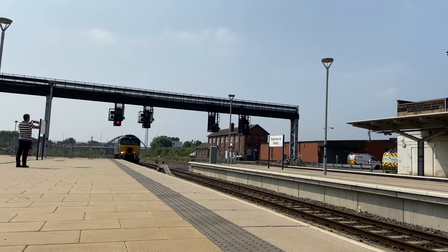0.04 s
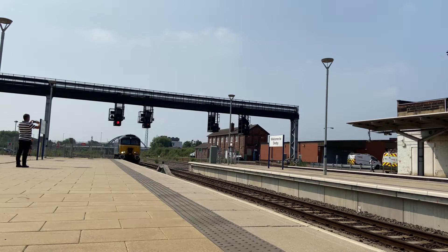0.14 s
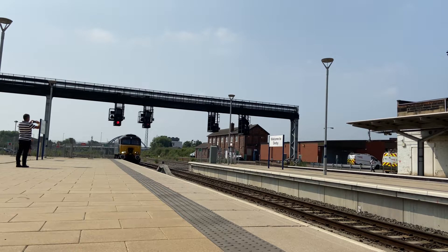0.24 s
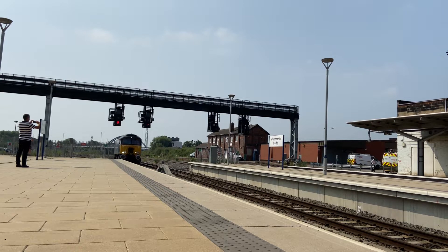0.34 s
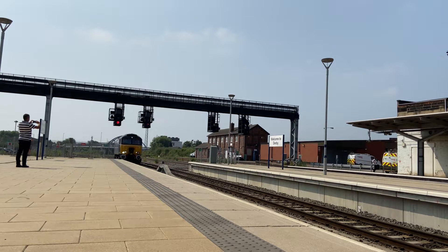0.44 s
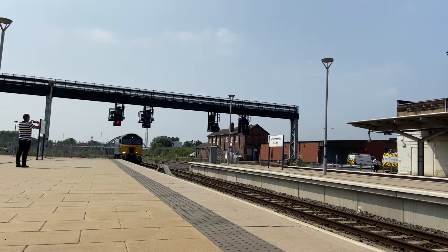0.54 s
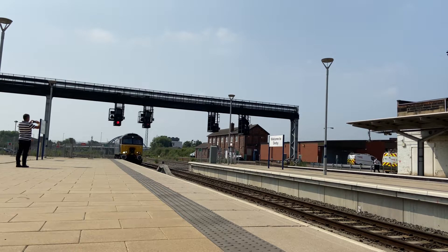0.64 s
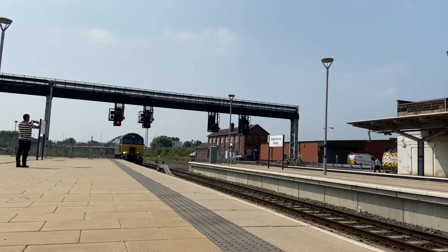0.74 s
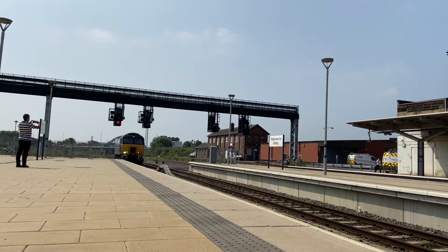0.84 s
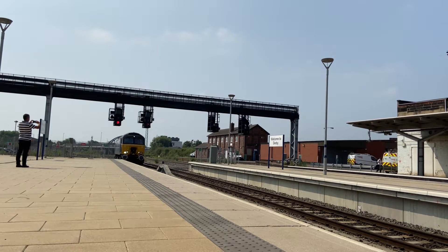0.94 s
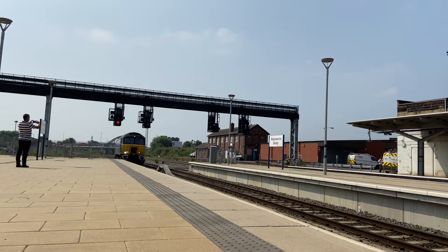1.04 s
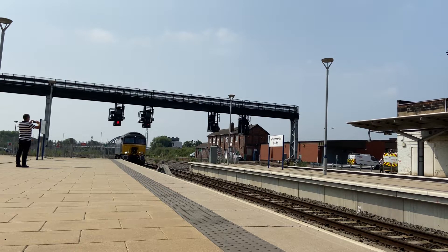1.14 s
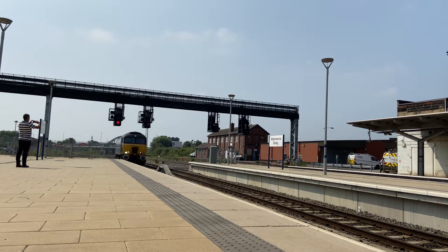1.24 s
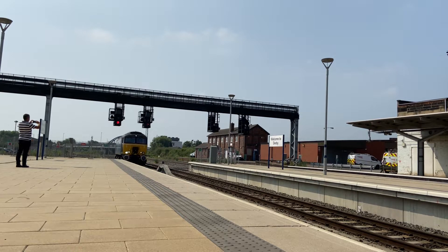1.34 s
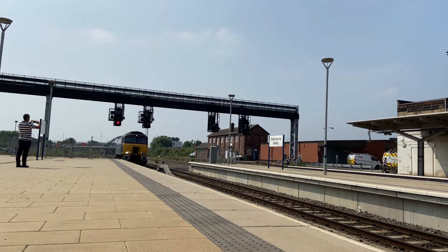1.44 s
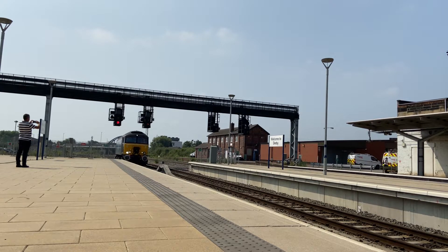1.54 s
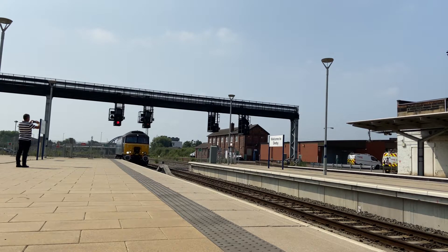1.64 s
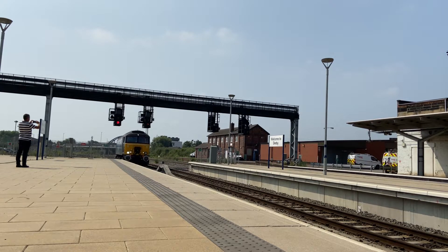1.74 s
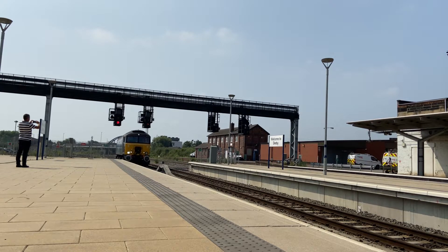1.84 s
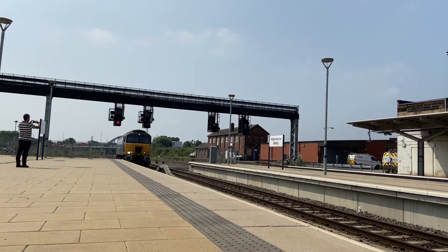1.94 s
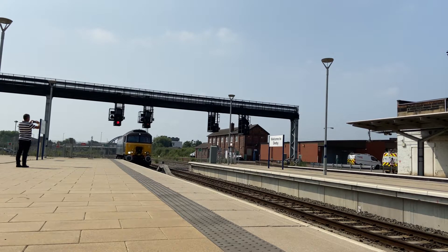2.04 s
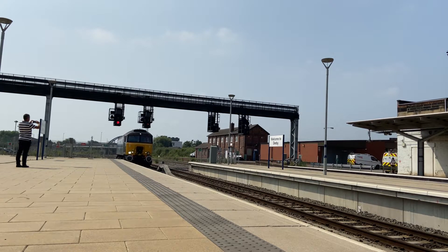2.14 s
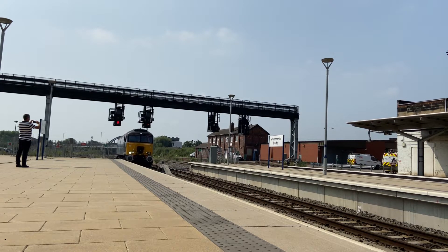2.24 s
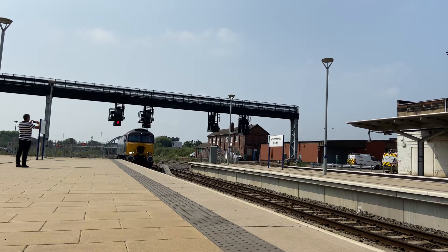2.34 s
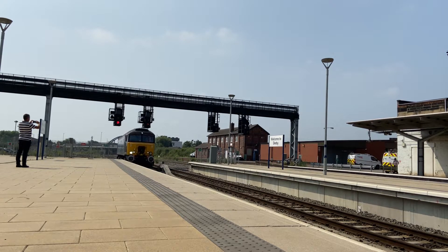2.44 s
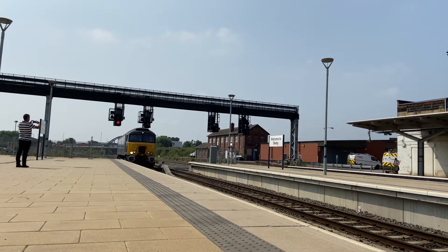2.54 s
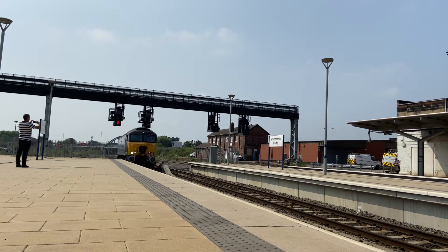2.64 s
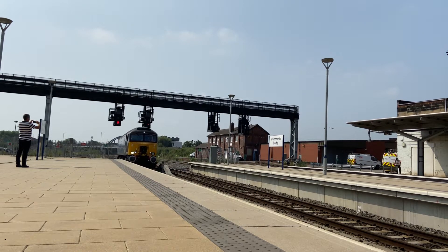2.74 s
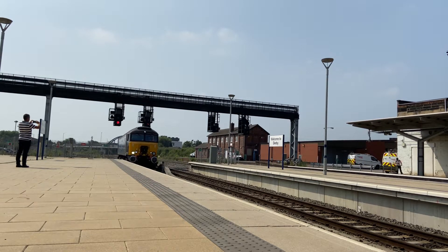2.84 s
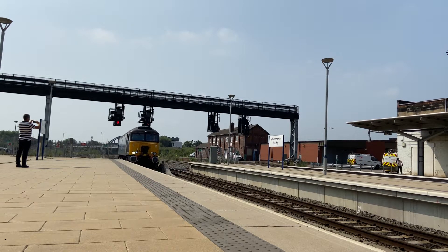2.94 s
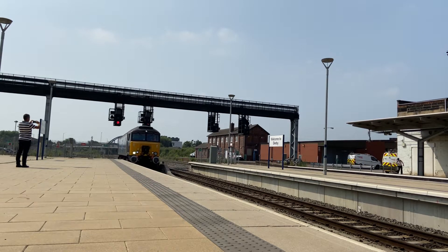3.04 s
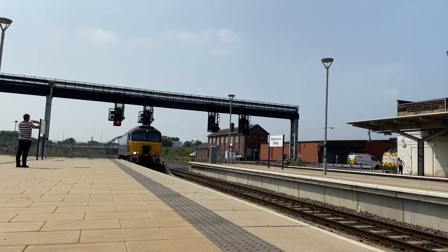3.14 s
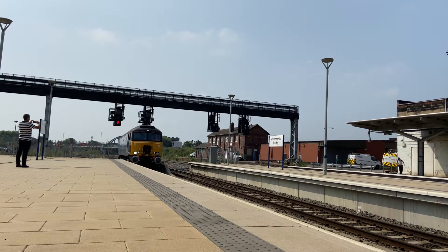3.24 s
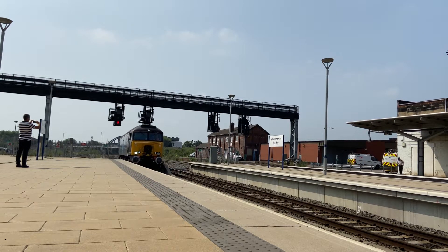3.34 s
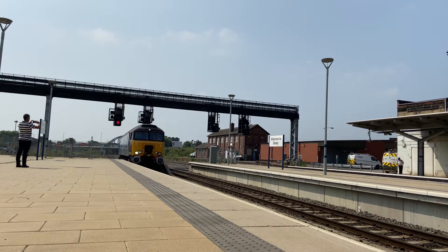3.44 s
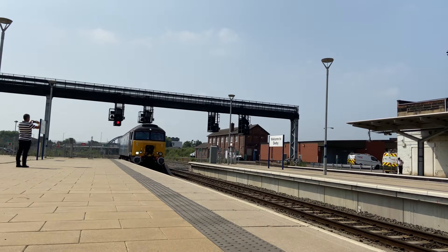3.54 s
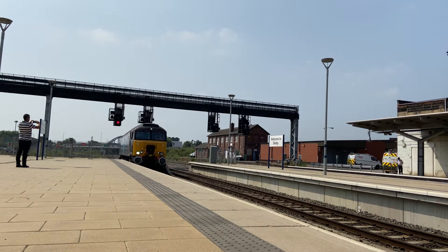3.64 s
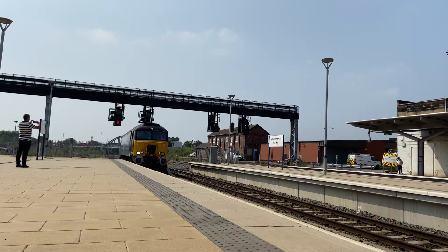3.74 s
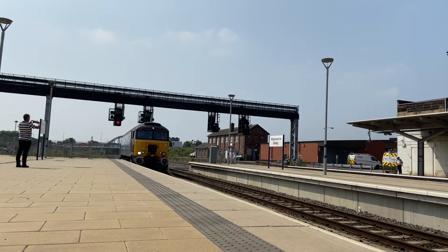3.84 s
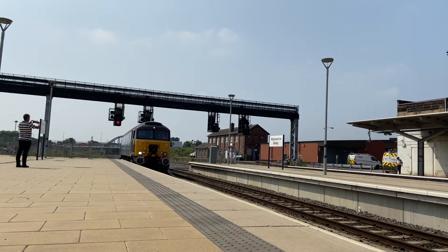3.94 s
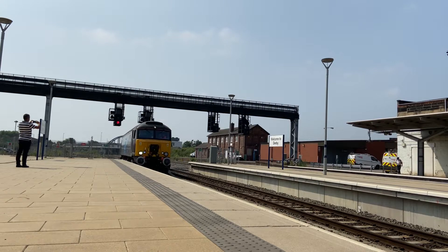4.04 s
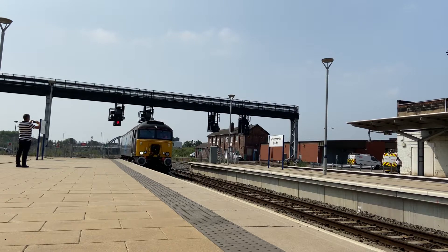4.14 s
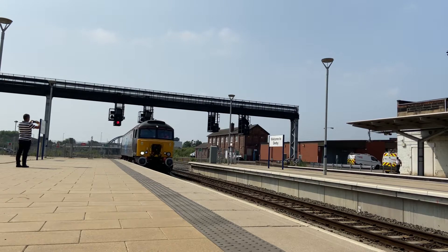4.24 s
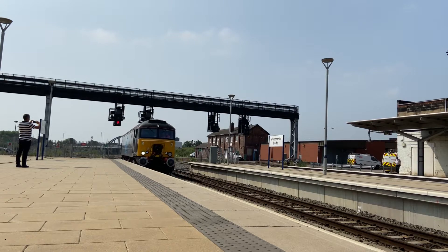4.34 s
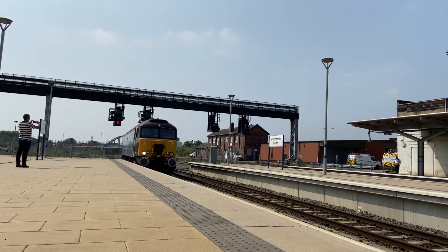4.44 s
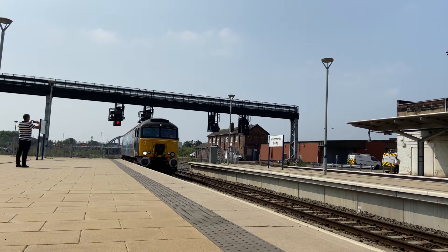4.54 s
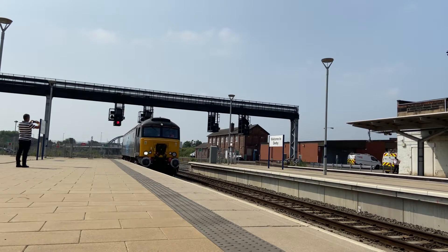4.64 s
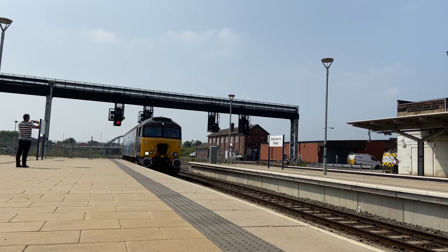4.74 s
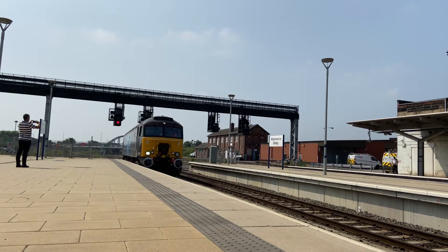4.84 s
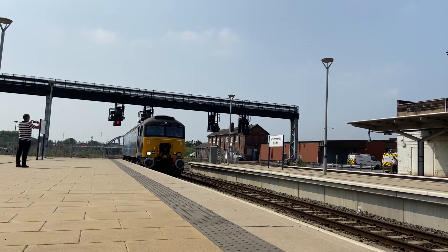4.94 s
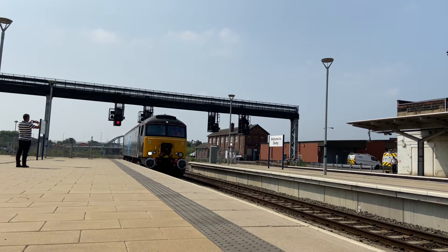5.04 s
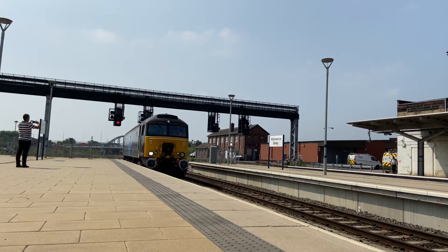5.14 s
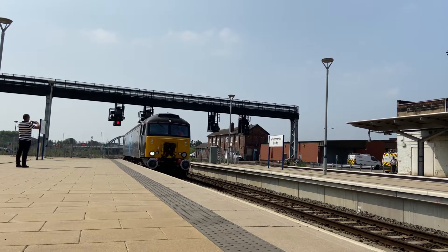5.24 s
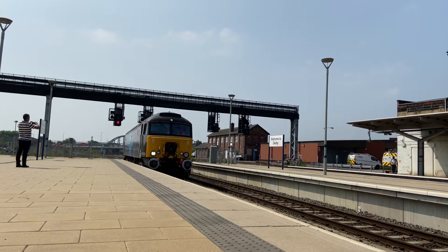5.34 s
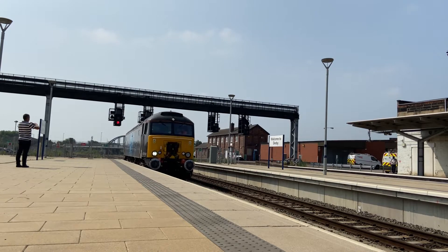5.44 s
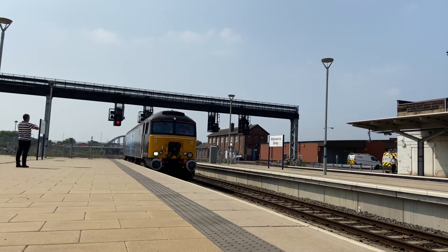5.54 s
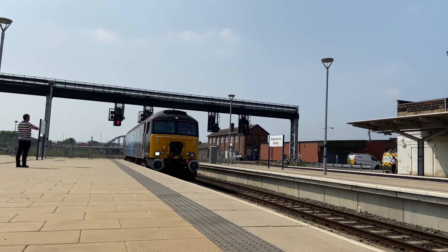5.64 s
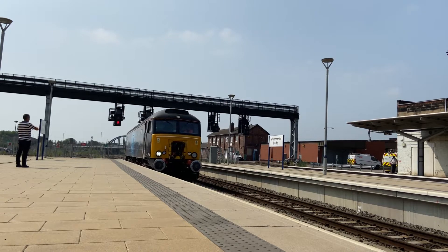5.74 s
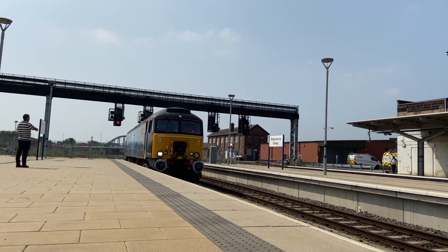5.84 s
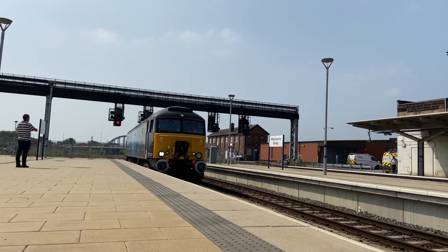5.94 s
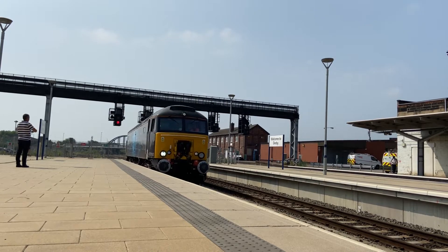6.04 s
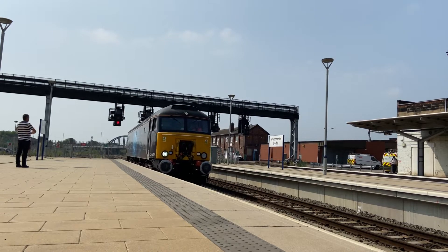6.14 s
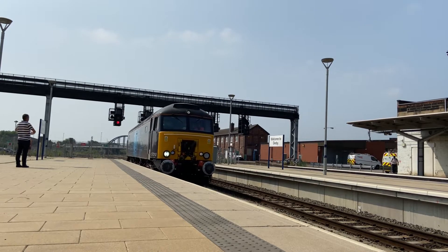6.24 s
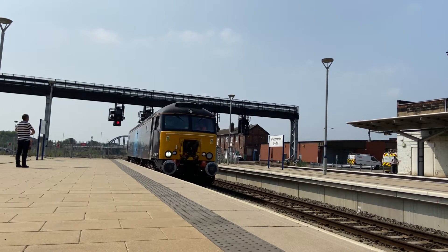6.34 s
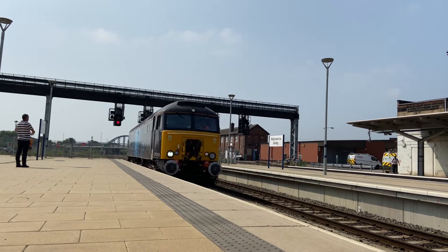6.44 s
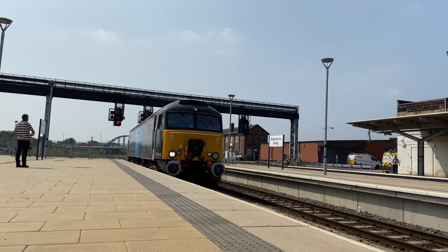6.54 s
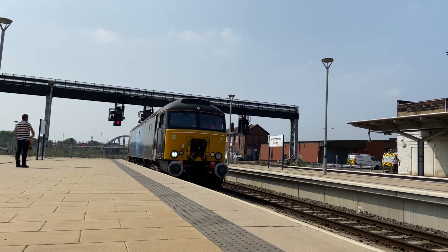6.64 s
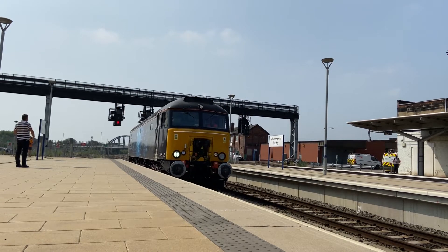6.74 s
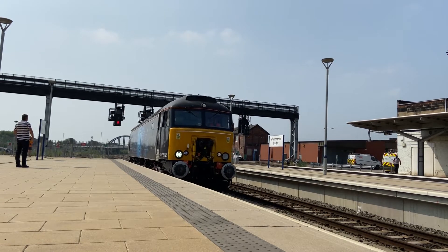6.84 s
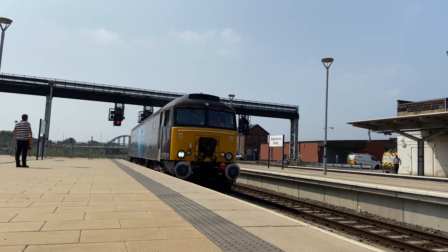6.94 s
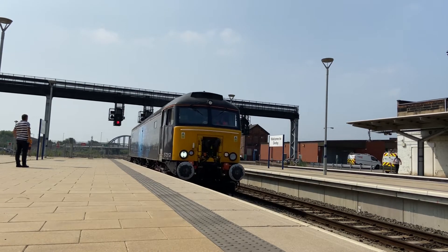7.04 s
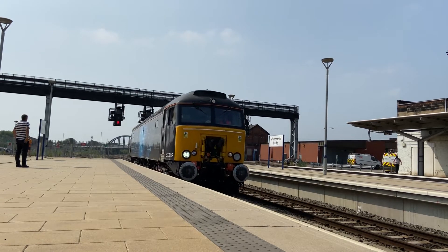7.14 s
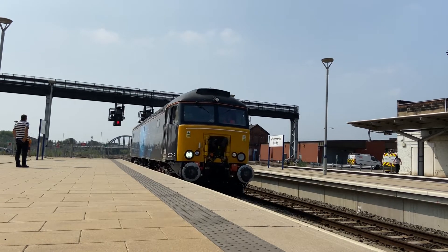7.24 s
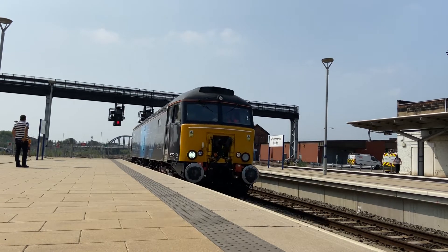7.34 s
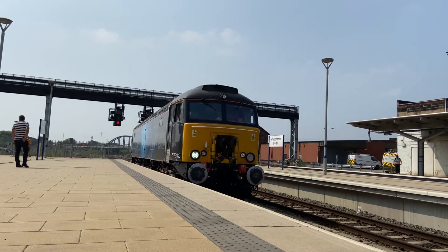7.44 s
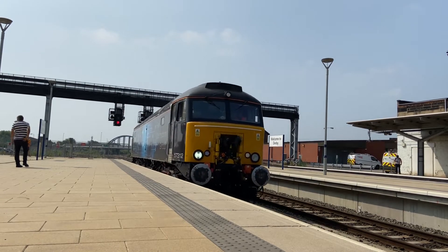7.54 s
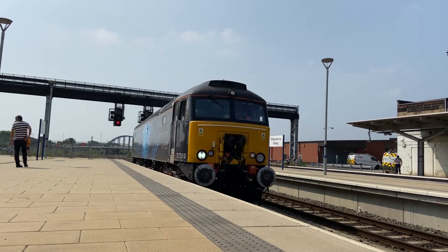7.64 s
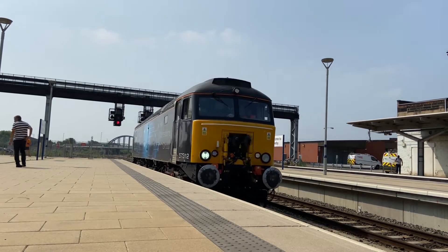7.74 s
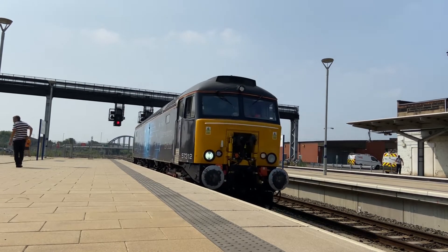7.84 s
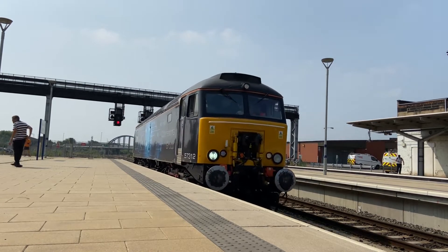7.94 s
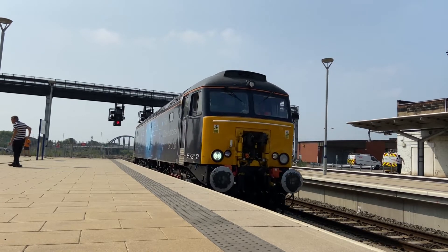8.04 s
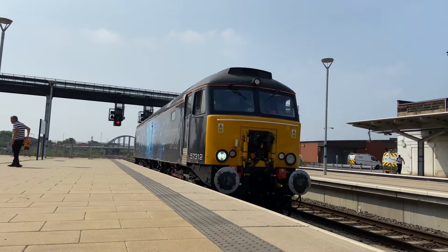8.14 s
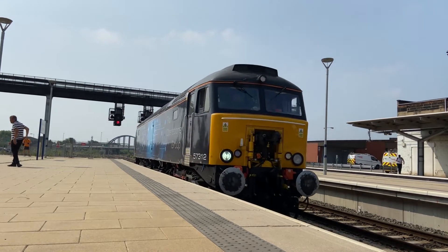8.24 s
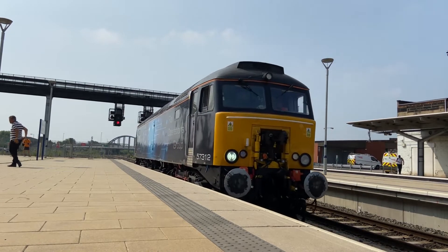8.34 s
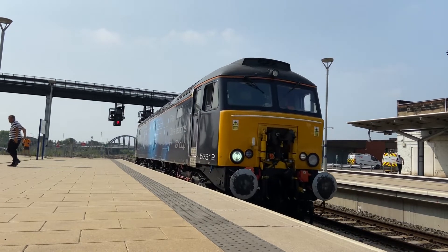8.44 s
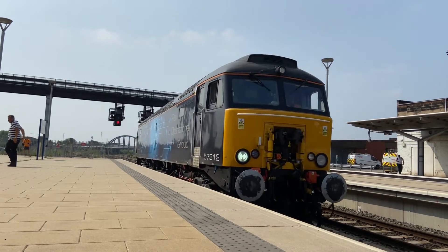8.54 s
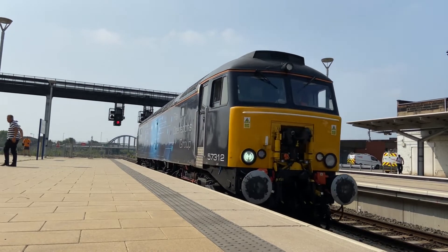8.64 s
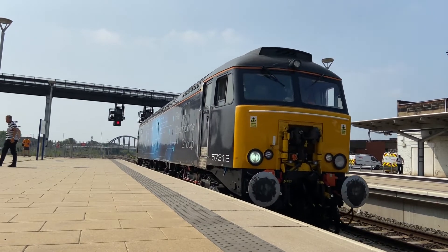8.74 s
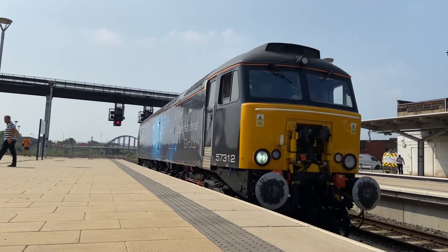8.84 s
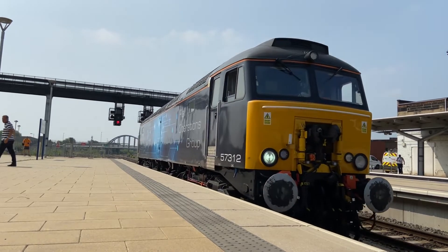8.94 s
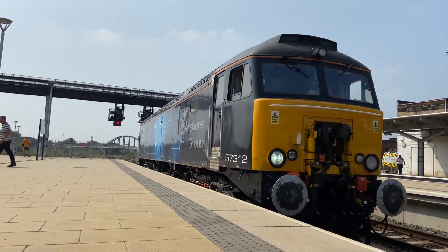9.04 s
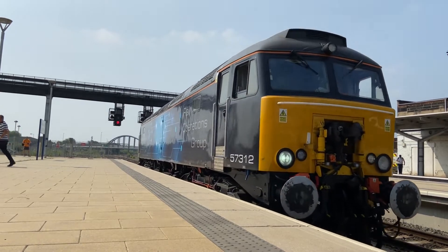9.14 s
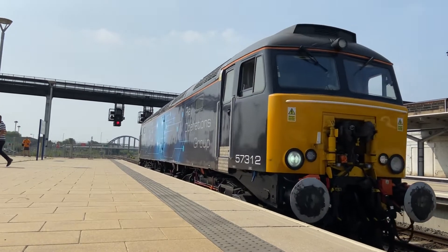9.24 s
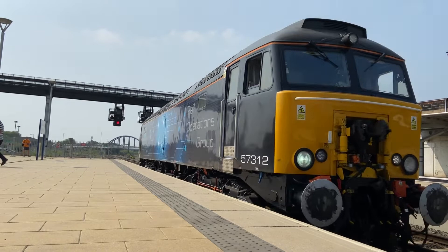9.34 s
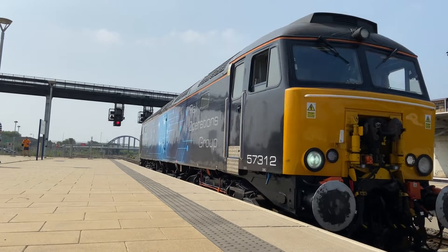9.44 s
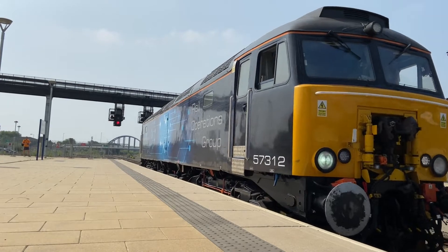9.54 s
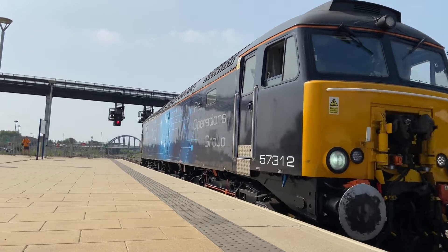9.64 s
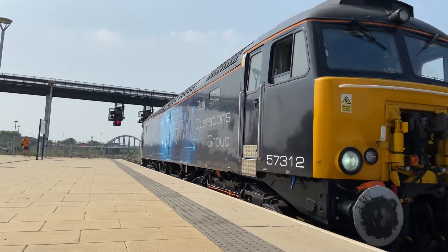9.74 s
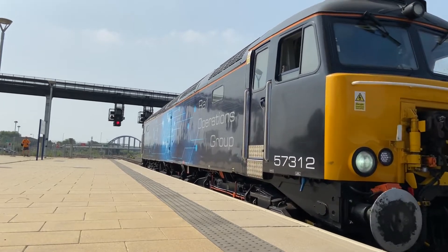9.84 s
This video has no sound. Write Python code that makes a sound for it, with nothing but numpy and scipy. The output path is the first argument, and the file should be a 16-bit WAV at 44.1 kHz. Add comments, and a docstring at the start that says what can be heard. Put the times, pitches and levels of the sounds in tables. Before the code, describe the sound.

Deep pulsing diesel drone swells as a locomotive rolls close; a nearby camera clicks four times, then air bursts and light steel clanks follow.

```python
"""Diesel locomotive rolling up to a platform

A slow diesel approaches an open station platform. Sines on low shaft orders make its exhaust throb, with wall echoes;
shaped noise and shaft-locked patterns make rumble, roar and hiss. Fluttering sines are the blower's whine and faint
high tones, blurred tones squeal and whine, and a noise jet is air let off by a valve. A photographer's shutter clicks
nearby: noise bursts ring a small body and a motor sings. A hollow knock and three steel clanks are decaying sines."""
import sys
import numpy as np
from scipy import signal
from scipy.fft import rfft, irfft, next_fast_len
from scipy.io import wavfile
from scipy.ndimage import uniform_filter1d, map_coordinates

SR = 44100
rng = np.random.default_rng(int(sys.argv[2]) if len(sys.argv) > 2 else 0)


def master(y):
    """Save y as 16-bit WAV."""
    cut = np.clip(np.atleast_2d(y).T, -1, 1)
    pcm = np.round(cut * 32767)  # scale
    wavfile.write(sys.argv[1], SR, pcm.astype(np.int16))


N = 435708
TIME = np.arange(N) / SR
LEFT_RIGHT = np.array([[1], [-1]])  # opposite signs for the two channels


def engine():
    """One crankshaft angle drives the exhaust orders and the pulsing noise layers."""
    turns = crank()
    # uneven cylinders make the noise pulse once and twice a turn
    pulse = 1 - 0.032 * np.cos(2 * np.pi * turns) + 0.079 * np.cos(4 * np.pi * turns + 1.8)
    return exhaust(turns) + rumble(turns) + roar(turns, pulse) + hiss(pulse)


# Crankshaft speed as heard, sinking as the approach angle opens: time_s, speed_turns_per_s
SHAFT_SPEED = [(0, 7.066), (3, 7.036), (6, 7.011), (7.5, 6.991), (8.5, 6.935), (9.88, 6.933)]


def crank():
    """Crankshaft angle in turns, the running sum of the speed; zero at 9 s."""
    turns = np.cumsum(curves(SHAFT_SPEED)[0]) / SR
    return turns - turns[9 * SR]


# Exhaust note at one second of travel: shaft_order, level_db (rms)
EXHAUST_ORDERS = [(6, -29.5), (7, -16), (8, -12), (9, -8.5), (10, -24.5)]
# Echoes off walls and canopies: detour_at_start_m, detour_growth_m_per_s, level_at_start_db, level_slope_db_per_s
WALL_ECHOES = [(73.1, 3.09, -22.75, -0.07), (63.49, 1.729, -22.9, -1.19), (54.8, 2.471, -32.6, 0.96),
               (7.48, 0.33, -43.9, 3.28)]


def exhaust(turns):
    """Steady shaft orders, direct and off four surfaces; as the detours grow, orders swell and cancel in turn."""
    order, level_db = np.transpose(EXHAUST_ORDERS)[:, :, None]
    # the pipe delays each order differently, in cycles
    lag = .175 * (order - 8) ** 2 - .1 * (order - 8) - .11

    def note(angle):
        sines = amp(level_db) * np.cos(2 * np.pi * (order * angle + lag))
        return np.sqrt(2) * np.sum(sines, axis=0)

    turns_per_m = curves(SHAFT_SPEED)[0] / 343  # speed of sound, m/s
    out = amp(near_db()) * note(turns) * np.ones((2, 1))
    for detour_m, growth, start_db, db_per_s in WALL_ECHOES:
        balance = amp(0.94 * wobble(0.735) * LEFT_RIGHT)
        late_turns = turns - turns_per_m * (detour_m + growth * TIME)
        out = out + balance * amp(start_db + db_per_s * TIME) * note(late_turns)
    return out


# Rumble colour: freq_hz, density_db (per Hz, relative)
RUMBLE_SPECTRUM = [(25, -32), (38, 0), (60, 4), (100, 5), (160, -1.5), (240, -8), (330, -51.5)]
# Weaker orders that ride on the rumble: shaft_order, relative_db
UPPER_ORDERS = [(11, -9), (12, -9), (13, -6), (14, 2), (15, -5), (16, -11), (17, -6), (18, 1), (22, -4),
                (26, -11), (27, -11), (29, -8)]


def rumble(turns):
    """Low noise plus weaker shaft orders; the orders come forward as the engine nears."""
    level_db = -20 + 0.69 * near_db() + 0.51 * wobble(2.787)
    noise_db = level_db - 0.5 - 0.12 * (near_db() + 14.5)
    order_db = level_db - 8 + .45 * (near_db() + 8)
    riding = orders(UPPER_ORDERS, turns, waver_db=2.2, loose=.4)
    return amp(noise_db) * rush(RUMBLE_SPECTRUM) + amp(order_db) * riding


# Roar colour: freq_hz, density_db (per Hz, relative)
ROAR_SPECTRUM = [(120, -39), (200, -4.5), (268, -4), (339, -2), (405, -3.5), (591, 1.5), (1100, -14.5),
                 (1430, -68), (2420, -120)]
# Panel resonances of the casing: freq_hz, width_hz, gain_db
CASING_RESONANCES = [(309, 53, 4.5), (544, 84, -5), (565, 200, -3.5), (668, 64, -1.5), (837, 113, 5)]
# Orders at which the casing panels sing clearly: shaft_order, relative_db
PANEL_ORDERS = [(44, -23), (45, -20), (47, -17), (48, -19), (49, -13), (51, -15), (52, -20), (54, -18),
                (62, -21), (63, -21), (64, -21), (65, -22), (66, -20), (72, -21), (73, -23), (74, -21),
                (76, -18), (77, -21), (78, -20), (79, -21), (84, -8.5), (90, -14), (92, -15.5), (105, -19),
                (106, -21), (119, -17), (120, -21), (157.5, -23)]
# One band of the casing dips once a turn: depth is a ratio, sharp narrows the dip in the turn
GAP_HZ, GAP_TOP_HZ, GAP_TURNS, GAP_DEPTH, GAP_SHARP = 550, 690, .97, 1.2, 3.5


def roar(turns, pulse):
    """Casing noise through panel resonances, mixed with clatter and panel orders locked to the shaft."""
    level_db = -20 + 0.7 * near_db() + 0.51 * wobble(2.787)
    clear_db = 0.75 * (level_db + 24.0)  # nearer, the repeating part stands out of the blur
    beat = amp(-4) * rush(ROAR_SPECTRUM, CASING_RESONANCES, clatter(turns, renew=1.2))
    # the panel orders gain on the clatter as the engine nears
    panel_db = 6 + .3 * (near_db() + 10)
    beat = beat + amp(panel_db) * orders(PANEL_ORDERS, turns, waver_db=1.8, loose=.3)
    mix = rush(ROAR_SPECTRUM, CASING_RESONANCES) + amp(clear_db) * beat
    mix = mix / np.sqrt((1 + amp(2 * clear_db)) / 2)
    out = amp(level_db - 3.0) * pulse * mix
    dip = np.exp(GAP_SHARP * (np.cos(2 * np.pi * (turns - GAP_TURNS)) - 1))
    gap = GAP_DEPTH * dip * np.minimum(amp(clear_db), 1)
    return out - gap * filtered(out, lambda hz: (hz > GAP_HZ) & (hz < GAP_TOP_HZ))


def clatter(turns, renew):
    """Valve and piston clatter repeats every turn; its random pattern blends into a new one, renew times a second."""
    steps = 1024  # points round one turn
    pattern = rng.standard_normal((2, int(N / SR * renew) + 3, steps))
    spot = [TIME * renew, turns % 1 * steps]
    return unit(np.array([map_coordinates(p, spot, order=3, mode="grid-wrap") for p in pattern]))


# Where in the turn neighbouring orders add up: freq_hz, position_turns
THROB_POSITION = [(100, .48), (250, .48), (290, .18), (400, .18), (450, .5), (1200, .5)]


def orders(table, turns, waver_db, loose):
    """Sines on multiples of the shaft; neighbours keep roughly in step and so throb once a turn."""
    out = np.zeros((2, N))
    for order, level_db in table:
        drift = loose * wobble(1.5)
        apart = loose * wobble(1.2) * LEFT_RIGHT
        # about 7 turns a second give the frequency of the order
        angle = 2 * np.pi * order * (turns - along(THROB_POSITION, 7 * order))
        level = amp(level_db + waver_db * wobble(1.5))
        out += level * np.cos(angle + drift + apart * order / 45)
    return np.sqrt(2) * out


# Hiss of fans and wheels over time: time_s, relative_db
HISS_LEVELS = [(0, -46.5), (1, -43.5), (2.2, -41.5), (4.5, -39), (7, -38), (9, -37.5), (9.88, -35.5)]
# Hiss colour: freq_hz, density_db (per Hz, relative)
HISS_SPECTRUM = [(530, -2), (900, -4), (1170, -4.5), (3320, -11), (3650, -6.5), (3920, -12.5),
                 (6660, -18.5), (8730, -30.5), (9590, -29), (11400, -41.5), (12400, -32), (14500, -45),
                 (15000, -70)]
# Fuzzy ringing of fans, gears and rails: freq_hz, width_hz, gain_db
RINGING_BANDS = [(1717, 78, -1), (1866, 82, 2.5), (2288, 100, 6.5), (4950, 22, 4.5), (5930, 33, 3),
                 (9350, 48, 10), (10070, 69, 10.5)]
DULL_HZ, DULL_TOP_HZ, DULL_SHARE = 2660, 8640, 0.65  # band edges; share of the distance law


def hiss(pulse):
    """Fan and wheel noise, faintly pulsed; its treble follows the distance law further, so far off it is duller."""
    level_db, = curves(HISS_LEVELS)
    noise = unit(pulse ** 0.17 * rush(HISS_SPECTRUM, RINGING_BANDS))
    out = amp(level_db + 4.5 + 0.69 * wobble(7)) * noise

    def treble_band(hz):
        low_cut = 1 / (1 + (DULL_HZ / (hz + 1)) ** 4)
        return low_cut / (1 + (hz / DULL_TOP_HZ) ** 4)

    return out + (amp(DULL_SHARE * (near_db() + 10.5)) - 1) * filtered(out, treble_band)


ABREAST_S, OFFSET_S = 10.38, 2.51  # when the exhaust draws level; distance of the track in seconds of travel


def near_db():
    """Spreading loss of the direct path as the locomotive rolls up; 0 dB at one second of travel."""
    return -10 * np.log10(OFFSET_S ** 2 + (TIME - ABREAST_S) ** 2)


# Blower gear tones, which fade in and out on their way through the air: time_s, upper_relative_db, lower_relative_db
BLOWER_LEVELS = [(0.0, -65, -66), (2.28, -57.5, -62), (3.11, -46, -46), (3.22, -58, -53), (3.44, -45, -47),
                 (3.58, -60, -49), (3.93, -42, -50), (4.02, -62, -56), (4.37, -54, -44), (4.68, -52, -53),
                 (4.73, -38, -50), (4.87, -50, -47), (5.45, -52, -55), (5.86, -43, -44), (5.92, -54, -59),
                 (5.97, -41, -55), (6.22, -43.5, -52), (6.41, -49, -57), (6.44, -49, -42), (6.8, -51, -48),
                 (6.88, -37.5, -43), (7.13, -48, -49), (7.18, -44.5, -42), (7.76, -46.5, -44),
                 (7.81, -42.5, -35.5), (8.61, -49.5, -48.5), (8.86, -49, -36), (9.22, -55, -51),
                 (9.3, -47, -45), (9.88, -48, -57)]
# Pitch of the upper gear tone: time_s, pitch_hz
BLOWER_PITCH = [(0, 3665), (5.5, 3628), (8.5, 3610), (9.88, 3605)]


def blower():
    """The blower's two gear tones, 87 Hz apart, sink together as the engine approaches."""
    upper_db, lower_db = curves(BLOWER_LEVELS)
    pitch_hz, = curves(BLOWER_PITCH)
    upper = amp(upper_db + 2.5) * tone(pitch_hz, .45, .5, 35)
    lower = amp(lower_db - 2.5) * tone(pitch_hz - 87, .55, .5, 35)
    return upper + lower


# Faint high tones: time_s, lower_relative_db, upper_relative_db
HIGH_TONE_LEVELS = [(0, -90, -95), (6, -68, -90), (8.7, -63, -78), (8.85, -53, -74), (9.0, -67, -59),
                    (9.4, -50.5, -60), (9.88, -46, -51)]


def high_tones():
    """Two fluttering high tones of fixed pitch; the upper one is a thin flickering tone."""
    low_db, high_db = curves(HIGH_TONE_LEVELS)
    low = amp(low_db) * tone(9310, .3, .15, 30)
    high = amp(high_db - 4 + 5 * wobble(12)) * tone(10700, .9, .15, 60)
    return low + high


def tone(hz, scattered, spread, rate):
    """A sine plus a scattered share of itself, rms 1: it flutters with sharp dips, differently at each ear."""
    phase = 2 * np.pi * np.cumsum(hz + np.zeros(N)) / SR + spread * LEFT_RIGHT
    a, b = (scattered * np.array([wobble(rate), wobble(rate)]) for _ in "ab")
    return unit((1 + a) * np.sin(phase) + b * np.cos(phase))


# Squeals of the running gear, and last a long gear whine locked to the shaft:
# start_s, length_s, pitch_at_start_hz, blur_hz, relative_db
SQUEALS_AND_WHINE = [(0, 5, 5890, 50, -69), (0, .65, 5900, 60, -68), (.49, .27, 4980, 15, -61),
                     (.77, .1, 4970, 40, -68), (.8, .65, 5900, 70, -66), (.7, .24, 1810, 110, -57),
                     (1.06, .14, 1850, 40, -54), (1.23, .2, 1810, 80, -55), (.95, .3, 2300, 60, -61),
                     (1.44, .25, 1865, 60, -52), (1.43, .18, 2300, 25, -54), (1.65, .2, 2280, 70, -56),
                     (1.83, .39, 1830, 130, -54), (2.0, .11, 2300, 40, -55), (2.22, .2, 2310, 50, -54),
                     (2.6, .6, 5890, 70, -66), (2.7, .22, 1870, 60, -55), (2.84, .34, 2295, 50, -53),
                     (3.04, .16, 4975, 30, -63), (3.3, .8, 4930, 50, -67), (6.25, 2.65, 2760, 25, -60)]


def squeals_and_whine(turns):
    """Each is a blurred tone that swells, flickers and fades; its pitch sinks like the shaft's."""
    out, speed = np.zeros((2, N)), curves(SHAFT_SPEED)[0]
    for start_s, length_s, hz, blur_hz, level_db in SQUEALS_AND_WHINE:
        first, count = round(start_s * SR), round(length_s * SR)
        a, b, c, d, e, f = (wobble(2 * blur_hz, count=count) for _ in "abcdef")
        each_ear = np.array([c + 1j * d, e + 1j * f])
        blur = 0.7 + .8 * (a + 1j * b) + .7 * each_ear
        flicker = amp(2.0 * wobble(30, count=count))
        swell = np.sin(np.pi * TIME[:count] / length_s) ** .45 * flicker
        carrier = np.exp(2j * np.pi * hz * turns[first:first + count] / speed[first])
        out[:, first:first + count] += amp(level_db + 6) * swell * unit(np.real(blur * carrier))
    return out


# Air jet colour: freq_hz, density_db (per Hz, relative)
JET_SPECTRUM = [(2000, -3.5), (3500, -8), (5500, -4), (7000, -8.5), (9000, -16.5), (12000, -33)]
VALVE_S, OPEN_S, VALVE_DB, SAG_DB_PER_S, SAG_DB_PER_S2 = 8.815, 0.03, -34.5, 1, 22


def valve():
    """A burst of compressed air: jet noise that opens quickly, then sags ever faster."""
    t = np.maximum(TIME - VALVE_S, 0)
    level_db = VALVE_DB - SAG_DB_PER_S * t - SAG_DB_PER_S2 * t ** 2 + 0.54 * wobble(12)
    return amp(level_db) * (1 - np.exp(-t / OPEN_S)) * rush(JET_SPECTRUM)


# Steel clanks in the running gear: start_s, level_db, pitch_hz
STEEL_CLANKS = [(9.184, -30, 2250), (9.45, -33, 1610), (9.73, -32.5, 2270)]
# Modes of a clank: pitch_ratio, level_db, t60_s
STEEL_MODES = [(.8, -4, .03), (1.001, 3, 0.079), (1.12, 5, .03)]


def clanks():
    """Short steel blows, each ringing three modes tied to its own pitch."""
    out = np.zeros(N)
    for start_s, level_db, pitch_hz in STEEL_CLANKS:
        modes = [(ratio * pitch_hz, mode_db, t60) for ratio, mode_db, t60 in STEEL_MODES]
        out += struck(start_s, level_db, modes, attack_s=.001)
    return out


# Shutter releases: start_s, level_db, brightness_ratio (varies as the camera is turned)
RELEASES = [(2.228, -31.5, 1), (4.826, -31, 1.04), (5.654, -31, 1.02), (6.471, -30.5, 0.98)]


def shutter():
    """Each release is a train of contacts, a faint rattle and two bursts of the winding motor."""
    out = np.zeros((2, N))
    for start_s, level_db, bright in RELEASES:
        contacts(out, start_s, level_db, bright)
        rattle(out, start_s, level_db)
        winder(out, start_s, level_db)
    return out


# Mirror and curtain contacts of one release; the last is the spring running down:
# after_release_s, relative_db, t60_s, loudest_part_hz, fall_away_db_per_octave, treble_modes_db
CONTACT_HITS = [(-.001, -7.5, .02, 6000, 1, 7), (.0105, -12, .016, 5200, 6, 8),
                (.0195, -2, .018, 4550, 18, -5), (.04, -8, .018, 4300, 16, -7),
                (.0735, -2.5, .018, 5000, 7, 2), (.1228, 2.5, .02, 4200, 13, 1),
                (.1335, -4.5, .033, 4350, 22, 0), (.128, -17, .25, 4600, 5, 3)]


def contacts(out, start_s, level_db, bright):
    """Mirror and curtain hits: short decaying noise bursts ring the camera body."""
    t = np.arange(SR // 12) / SR
    for after_s, hit_db, t60, centre_hz, focus_db, treble_db in CONTACT_HITS:
        fade_db = level_db + 18.0 + hit_db + rng.normal(0, 1.4) - 60 * t / t60
        fade = amp(fade_db) * (1 - np.exp(-t / 0.00043))
        shared, own = rng.standard_normal(len(t)), rng.standard_normal((2, len(t)))
        burst = fade * (shared + 1.03 * own)
        add_rung(out, start_s + after_s, burst, body(bright * centre_hz, treble_db, focus_db))


RATTLE_FROM_S, RATTLE_S, RATTLE_DB = -0.028, .22, -8  # from the release; length; against the release level


def rattle(out, start_s, level_db):
    """The mechanism rattles faintly through the whole release: flickering noise rings the body."""
    u = np.arange(round(RATTLE_S * SR)) / (RATTLE_S * SR)
    flicker = amp(5 * wobble(120, count=len(u)))
    noise = np.sin(np.pi * u) ** 0.3 * flicker * rng.standard_normal((2, len(u)))
    add_rung(out, start_s + RATTLE_FROM_S, amp(level_db + RATTLE_DB) * noise, body(4800, 3.5, 3))


# The winding motor sings twice a release: after_release_s, length_s, start_hz, end_hz,
# then relative_db of multiples 2, 3, 4 and 5
WINDER_SONGS = [(.101, .022, 1935, 1925, -40, -21, -22, -30), (.144, .046, 2250, 2090, -28, -23, -23, -45)]


def winder(out, start_s, level_db):
    """The motor sings gliding multiples of its pitch over a fading whirr of noise in the body."""
    for after_s, length_s, start_hz, end_hz, *levels in WINDER_SONGS:
        u = np.arange(round(length_s * SR)) / (length_s * SR)
        count = len(u)
        phase = 2 * np.pi * np.cumsum(start_hz + (end_hz - start_hz) * u) / SR
        # brushes and gears make it rasp
        rough = unit(uniform_filter1d(rng.standard_normal((4, SR // 12)), size=200))
        song = np.zeros(count)
        for k, multiple_db in enumerate(levels):
            jitter = .5 * rough[k, ::-1][:count]
            song += amp(multiple_db + 2.5 * rough[k, :count]) * np.sin((2 + k) * phase + jitter)
        first = round((start_s + after_s) * SR)
        out[:, first:first + count] += amp(level_db + 3) * np.sin(np.pi * u) ** .36 * song
        whirr = (1 - u) * rng.standard_normal((2, count))
        add_rung(out, start_s + after_s, amp(level_db - 2.5) * whirr, body(4900, 1.5))


# Modes of the camera body, before a random spread: pitch_hz, width_hz, level_db
BODY_MODES = [(2630, 350, -1.5), (3070, 310, 3.5), (4010, 310, 1), (4660, 500, 1.5), (5650, 400, 1.5),
              (6700, 950, 0), (7850, 720, -10.5), (8670, 220, -15), (9500, 240, -16.5), (10400, 340, -24)]
TREBLE_HZ = 7000  # above this, treble_db sets the modes


def body(centre_hz, treble_db, focus_db=10):
    """Ringing of the camera body struck at one part: damped sines, strongest near centre_hz below the treble."""
    t = np.arange(SR // 100) / SR
    out = np.zeros(len(t))
    for hz, width_hz, level_db in BODY_MODES:
        gain_db = treble_db if hz > TREBLE_HZ else -focus_db * abs(np.log2(hz / centre_hz))
        level = amp(level_db + gain_db + rng.normal(0, 1.7)) * 2 * np.pi * width_hz / SR
        fade = np.exp(-np.pi * width_hz * t) * (1 - np.exp(-t / 0.00029))
        out += level * fade * np.sin(2 * np.pi * hz * rng.normal(1, 0.033) * t)
    return out[None]


def add_rung(out, start_s, burst, ringing):
    """Lets a burst ring a body and adds it in place, cut to the burst's length."""
    count = burst.shape[-1]
    out[:, round(start_s * SR):][:, :count] += signal.fftconvolve(burst, ringing)[:, :count]


# Hollow knock on the platform: start_s, level_db
PLATFORM_KNOCK = [(1.555, -20)]
# Modes of the knock: pitch_hz, level_db, t60_s
HOLLOW_MODES = [(407, 1.5, 0.15), (610, -4, 0.23), (656, -3, 0.14)]


def knock():
    """A soft blow on the platform that rings three low modes."""
    return sum(struck(start_s, level_db, HOLLOW_MODES, attack_s=.01) for start_s, level_db in PLATFORM_KNOCK)


def struck(start_s, level_db, modes, attack_s):
    """One blow: decaying sines behind a short attack."""
    out, t = np.zeros(N + SR), np.arange(SR // 4) / SR
    ring = sum(amp(mode_db - 60 * t / t60) * np.sin(2 * np.pi * hz * t) for hz, mode_db, t60 in modes)
    out[round(start_s * SR):][:len(t)] += amp(level_db) * ring * (1 - np.exp(-t / attack_s))
    return out[:N]


# Left-right likeness of the noise: freq_hz, correlation_ratio
STEREO_LIKENESS = [(60, .99), (95, .93), (190, .89), (280, .8), (400, .6), (570, .27), (780, .22),
                   (1600, .3), (2500, .15), (4500, .27), (8500, .45), (15000, .95)]


def rush(spectrum, peaks=(), source=None):
    """Stereo noise of rms 1 with resonant bumps; mid and side shares set how alike the channels are."""
    def shape(hz):
        bumps = 1 + sum(amp(2 * db) / (1 + (2 * (hz - c) / w) ** 2) for c, w, db in peaks)
        turn = np.arccos(np.clip(along(STEREO_LIKENESS, hz), -1, 1)) / 2
        return amp(along(spectrum, hz)) * np.sqrt(bumps) * [np.cos(turn), np.sin(turn)]
    noise = rng.standard_normal((2, N)) if source is None else source
    mid, side = filtered(noise, shape)
    return unit(np.array([mid + side, mid - side]))


def amp(db):
    """Decibels to gain."""
    return 10 ** (np.asarray(db) / 20)


def unit(x):
    """Scaled to rms 1."""
    return x / np.sqrt(np.mean(x ** 2) + 1e-20)


def along(points, hz):
    """(Hz, value) points read on a log frequency axis."""
    f, v = np.transpose(points)
    return np.interp(np.log(hz + 1), np.log(f + 1), v)


def curves(rows):
    """One value per sample for each column after the time."""
    s, *cols = np.transpose(rows)
    return [np.interp(TIME, s, c) for c in cols]


def wobble(rate, count=N):
    """A smooth random curve, rate knots a second."""
    coarse = TIME[:count + 16:16]
    knots = rng.standard_normal(int(count * rate / SR) + 4)
    return np.interp(TIME[:count], coarse, map_coordinates(knots, [coarse * rate]))


def filtered(x, response):
    """x times a complex response of frequency."""
    m = next_fast_len(N + SR // 2)
    return irfft(rfft(x, m) * response(np.fft.rfftfreq(m, 1 / SR)), m)[..., :N]


# Phase between left and right for the train: freq_hz, phase_rad
STEREO_PHASE = [(600, 0), (780, 1.5), (1700, 1.1), (2400, -.7), (3900, -.8), (5500, 1.8), (7500, -.2)]


def scene():
    """Train sounds with left shifted against right in phase, plus the shutter, knock and clanks."""
    train = engine() + blower() + high_tones() + squeals_and_whine(crank()) + valve()
    shifted = filtered(train, lambda hz: np.exp(-.5j * along(STEREO_PHASE, hz) * LEFT_RIGHT))
    return shifted + shutter() + knock() + clanks()


TOP_HZ = 14800


def record(dry):
    """Keeps nothing above the band limit."""
    return filtered(dry, lambda hz: hz < TOP_HZ)


dry = scene()
out = record(dry)
master(out)
```